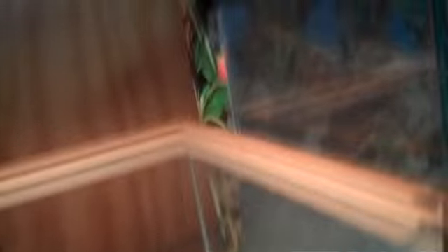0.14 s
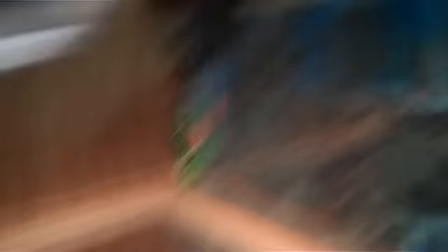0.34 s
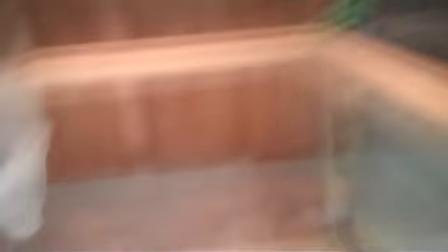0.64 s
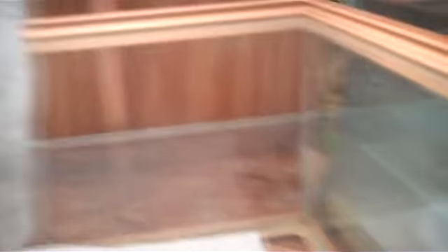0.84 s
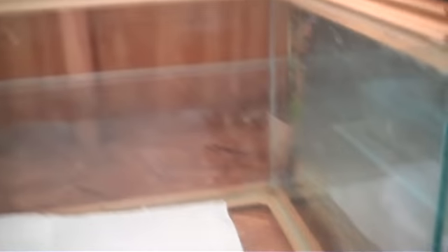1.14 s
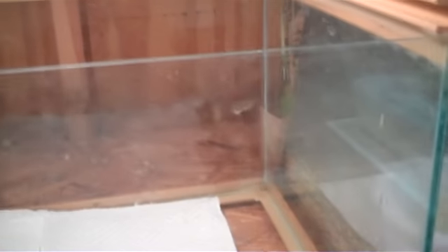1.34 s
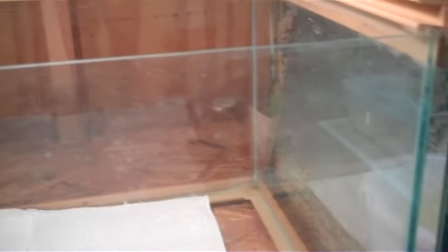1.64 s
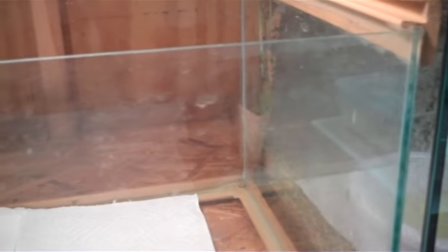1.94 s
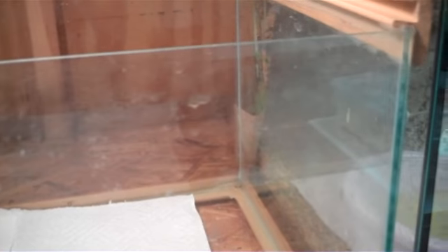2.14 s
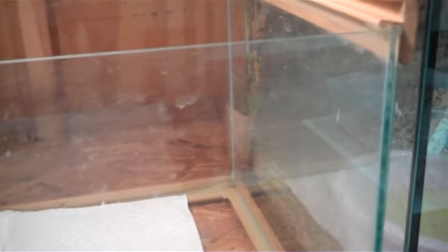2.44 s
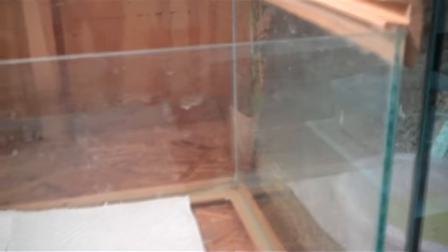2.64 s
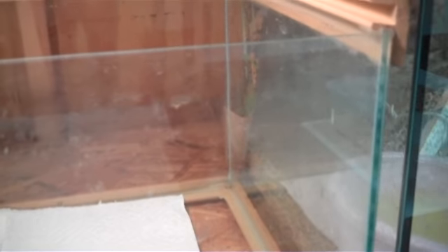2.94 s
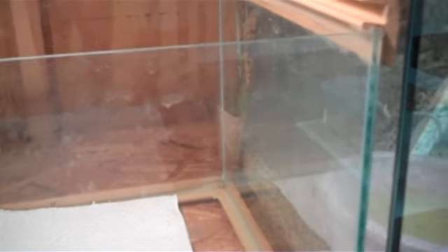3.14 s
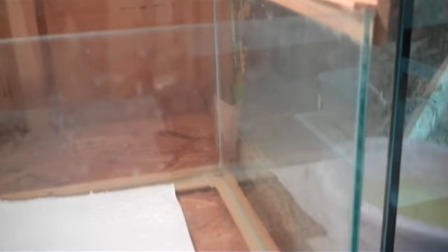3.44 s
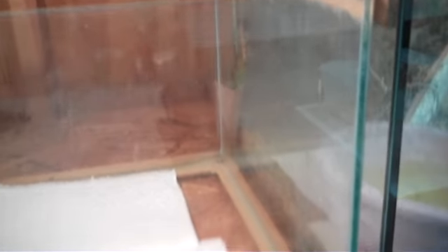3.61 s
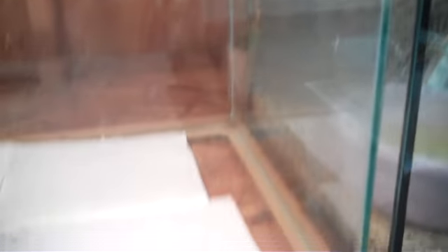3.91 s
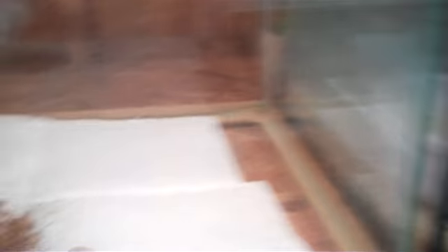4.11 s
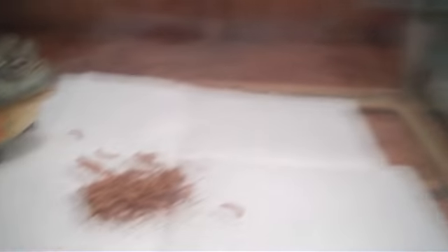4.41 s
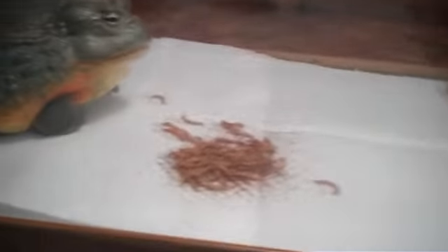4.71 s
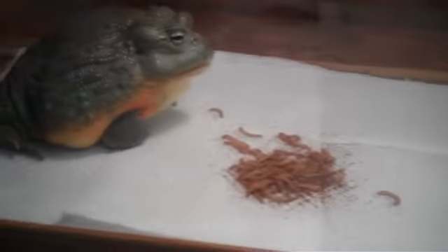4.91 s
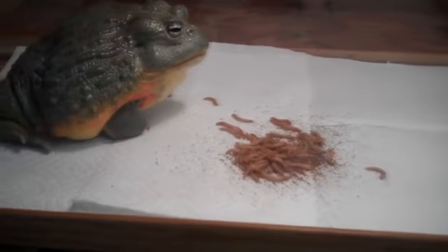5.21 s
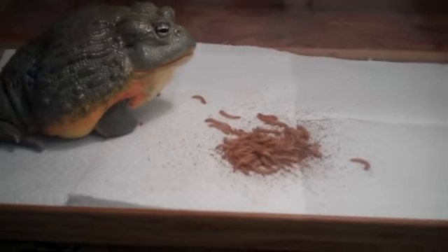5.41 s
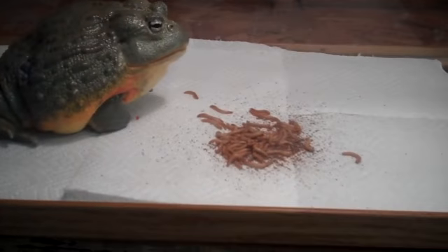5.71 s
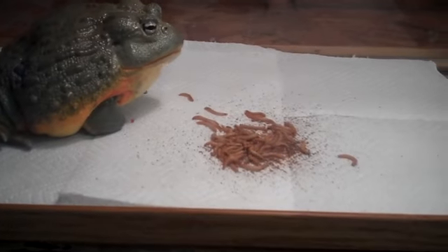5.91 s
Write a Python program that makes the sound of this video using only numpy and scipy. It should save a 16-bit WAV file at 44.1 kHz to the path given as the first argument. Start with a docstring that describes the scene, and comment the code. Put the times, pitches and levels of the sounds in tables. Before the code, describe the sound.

A quiet small room with faint steady air noise and barely audible hum, heard close from a handheld camera. From 0 to 0.3 s a thin plastic tub is handled right at the microphone: bright snaps, short crackle, soft dull bumps and a low lumpy finger rumble. A light stream of dry bran and small larvae then begins, a dense hiss of tiny ticks, uneven with a small surge near 1 s, swelling to its peak around 2.1 s, with occasional plastic ticks and soft tub knocks. It thins after 2.5 s and is nearly gone by 3.3 s. From 3.5 s the plastic is squeezed: a hard snap at about 3.75 s, then dense crisp crackling bursts from 4.1 to 5.3 s, packed tightest with sharp pops around 4.3 to 4.7 s. Crinkles grow sparser and softer until the end at 6 s.

```python
"""In a quiet room with faint hum, fingers rumble on a handheld camera as a thin plastic tub is picked
up close by, with pops, crackle and soft bumps. Dry bran and small larvae then slide out onto paper: a
dense stream of tiny ticks, a hiss swelling to its peak near 2 s. From about 3.5 s the squeezed plastic
crackles in dense bursts of ticks and sharp snaps, each a pair of millisecond rings with noise."""
import sys
import numpy as np
from scipy import signal
from scipy.fft import rfft, irfft, next_fast_len
from scipy.io import wavfile
from scipy.ndimage import uniform_filter1d

SR = 44100
rng = np.random.default_rng(int(sys.argv[2]) if len(sys.argv) > 2 else 0)


def voltage_ratio(decibels):
    """Convert decibels (scalar or array-like) to amplitude ratios, 20 dB per decade."""
    exponent = np.asarray(decibels, float) / 20
    return 10 ** exponent


def to_wav(sig):
    """Store sig (one row per channel, or 1-D mono) as 16-bit WAV at the path in sys.argv[1].

    Samples outside -1..1 are clipped; the rate is SR.
    """
    pcm = np.clip(np.atleast_2d(sig), -1, 1) * 32767
    pcm = np.round(pcm).astype(np.int16)
    wavfile.write(sys.argv[1], SR, pcm.T)  # frames by channels


N = 267246

# creases popping: start_s, ring_peak_db, ring_hz, second_ring_db (re ring), top_edge_db (re ring)
CREASE_POPS = [(0.0273, -21.5, 1660, -16, -50), (.0552, -19.5, 2360, -24, -55),
               (.0844, -27.5, 5920, -11, -41), (0.1388, -28, 1920, -11, -34), (0.1697, -8.5, 6460, -9, -26),
               (0.177, -19.5, 3030, -15, -50), (0.1835, -11, 6200, -3, -13), (0.2141, -16.5, 7000, -1, -24),
               (0.2476, -29.5, 1120, 1, -31), (.2521, -27.5, 5800, -19, -15), (0.307, -21, 6780, -25, -21),
               (0.312, -9.5, 6900, -13, -19), (0.321, -21.5, 5440, -19, -19), (0.6408, -21, 7100, -26, -17),
               (0.645, -26, 7000, -22, -35), (.7125, -27.5, 2160, -13, -40),
               (0.987, -27.5, 1950, -10.5, -29), (1.1097, -26.5, 3480, -9, -37),
               (1.1744, -20.5, 7240, -6, -36), (1.1794, -28, 4450, 0.5, -37),
               (1.6612, -28.5, 2830, -14, -30), (1.738, -29, 1320, 4, -44), (2.001, -26, 7300, 0, -30),
               (2.6378, -24, 3270, -14, -43), (3.201, -37, 2800, -1, -31.5), (3.4857, -21.5, 2050, -8, -40),
               (3.5358, -24.5, 3000, -0.5, -39), (3.6437, -21.5, 7200, -22, -18),
               (3.6674, -14.5, 7100, -1.5, -10), (3.7513, -24.5, 6740, 5.5, -21),
               (3.7547, -5, 6940, -26, -22), (3.7588, -28, 7400, -15, -28), (3.7957, -21, 6800, -20, -21),
               (3.8151, -18.5, 7450, -21, -14), (3.873, -27.5, 7260, -19, -30),
               (3.9067, -10, 6460, -31, -45), (3.9969, -13, 7300, -23, -34),
               (4.0319, -16.5, 3400, -13, -36), (4.0435, -14, 7550, -18, -12),
               (4.0534, -20, 7320, -15, -31), (4.0617, -22.5, 1980, -10, -32), (4.0832, -25, 7900, -1, -30),
               (4.1088, -13, 2420, -4, -14), (4.1414, -17, 2740, -12, -14), (4.1545, -20, 4250, -16, -32),
               (4.187, -17, 7400, -0.5, -30), (4.2588, -19.5, 3630, -20, -36), (4.262, -21, 3430, -16, -48),
               (4.2788, -16.5, 7250, -8, -30), (4.308, -22, 7040, -3, -38), (4.3204, -22, 2040, -12, -36),
               (4.3288, -22, 3500, -10, -40), (4.3371, -17, 7740, -25, -33), (4.3427, -17, 3250, -1, -11),
               (4.345, -9, 7400, -8, -15), (4.3574, -19.5, 2310, -8, -31), (4.392, -16, 3900, -20, -34),
               (4.396, -15.5, 3670, -19, -37), (4.3973, -15.5, 5850, -22, -37),
               (4.4121, -21, 3630, -20, -37), (4.416, -10.5, 3570, -16, -32), (4.4236, -10, 7580, -6, -19),
               (4.4322, -13, 3680, -8, -30), (4.4401, -15, 5200, -1, -30), (4.4883, -15, 3700, -17, -48),
               (4.5012, -13.5, 5460, -18, -16), (4.5176, -17, 5300, -6, -15), (4.522, -15, 6400, 3, -4),
               (4.5468, -11.5, 5700, -8, -14), (4.557, -16, 4720, -4, -28), (4.5965, -25.5, 4200, -12, -30),
               (4.6092, -22.5, 7500, -14, -45), (4.6424, -23, 4260, -13, -27), (4.648, -24, 3340, -6, -30),
               (4.6582, -12.5, 6000, -24, -21), (4.664, -21, 5850, -23, -13), (4.6984, -19, 7640, -12, -19),
               (4.7266, -16, 1540, 0, -40), (4.7504, -13, 5040, -10, -31), (4.7534, -22, 5670, -15, -31),
               (4.809, -16.5, 7260, -4, -37), (4.8307, -16.5, 7260, -9, -37),
               (4.8759, -17, 5800, -6, -11.5), (4.9425, -26, 2500, -12, -31), (4.9675, -26, 3950, -24, -43),
               (4.993, -23, 4160, -28, -34), (5.0133, -20, 2870, -20, -16), (5.0737, -22, 2350, -4, -8),
               (5.0785, -22, 7400, -15, -21), (5.1236, -24, 3150, -10, -31), (5.1287, -24, 5800, -14, -32),
               (5.162, -14.5, 3850, -10, -18), (5.174, -14, 5900, -26, -28), (5.2642, -19, 3600, -10, -46),
               (5.3217, -23, 6550, -12, -36), (5.3858, -20.5, 5670, -9, -38), (5.3962, -26.5, 5950, 2, -20),
               (5.489, -23.5, 5350, -19, -40), (5.5627, -33, 5370, -2, -35), (5.6402, -27, 7500, -4, -11),
               (5.801, -31, 4320, -15, -30), (5.8247, -27, 5960, -17, -33), (5.8852, -22, 7500, -7, -35)]
# spectrum of the plastic: frequency_hz, density_db (per Hz)
PLASTIC_SPECTRUM = [(120, -75), (200, -11), (323, -8), (360, -10), (829, -6), (956, -10), (1180, -5),
                    (1980, -1.5), (2450, -0.5), (4250, 5.5), (5960, 6), (7650, 4), (10500, -13),
                    (14000, -27.5)]
NEAR_UNTIL_S = 0.308  # at first the tub is at the camera


def evened(x):
    """Scales to rms 1."""
    return x / np.sqrt(np.mean(x ** 2) + 1e-20)


def read(points, hz):
    """Reads a spectrum table on a log-frequency axis."""
    f, value = np.transpose(points)
    return np.interp(np.log(hz + 1), np.log(f + 1), value)


def curve(rows):
    """The level column of a time table at every sample, and a gate that is open while the table runs."""
    rows, t = np.asarray(rows), np.arange(N) / SR
    running = (t > rows[0, 0]) & (t < rows[-1, 0])
    gate = uniform_filter1d(1. * running, 300)
    return np.interp(t, rows[:, 0], rows[:, 1]), gate


def colour(points, size=2048):
    """Minimum-phase impulse response with the given spectrum, energy 1."""
    level_db = np.maximum(read(points, abs(np.fft.fftfreq(size, 1 / SR))), -100)
    log_spectrum = np.conj(signal.hilbert(np.log(voltage_ratio(level_db))))
    taps = np.fft.ifft(np.exp(log_spectrum)).real[:size // 2]
    return taps / np.linalg.norm(taps)


def coloured(x, points, size=2048):
    """Gives both draws a spectrum, rms 1."""
    return evened(signal.oaconvolve(x, colour(points, size=size)[None], axes=1)[:, :N])


def band(x, lo_hz, hi_hz):
    """Gentle band-pass."""
    return signal.sosfilt(signal.butter(2, [lo_hz, hi_hz], "band", fs=SR, output="sos"), x)


def grains(per_s, spread_db, clump_db, clump_s, wet_db, t60_s, count=18):
    """Tiny tuned ticks of uneven size plus a haze of close reflections; two draws share one clumping."""
    clumps = evened(uniform_filter1d(rng.standard_normal(N), max(round(clump_s * SR), 2)))
    size = voltage_ratio(spread_db * np.minimum(rng.exponential(1, (2, N)), 4))
    size *= rng.random((2, N)) < per_s / SR
    size *= voltage_ratio(clump_db * clumps) * rng.choice([-1., 1.], (2, N))
    kind = rng.integers(0, count, (2, N))
    t, ticks = np.arange(192) / SR, np.zeros((2, N))
    for k, hz in enumerate(np.linspace(300, 15000, count)):
        life_s = .00005 * 1.88 ** (k % 3)  # from a bare click to a few cycles
        tick = np.cos(2 * np.pi * hz * t) * t * np.exp(-t / life_s) / life_s ** 1.83
        ticks += signal.oaconvolve(size * (kind == k), tick[None], axes=1)[:, :N]
    # glass, paper and tub return each tick's energy as noise that dies away
    keep = voltage_ratio(-120 / (t60_s * SR))  # power kept per sample
    haze_power = signal.lfilter([1 - keep], [1, -keep], evened(size) ** 2)
    haze = np.sqrt(haze_power) * rng.standard_normal((2, N))
    return evened(evened(ticks) + voltage_ratio(wet_db) * haze)


def patchy(x, patch_db):
    """Random drifting patches of level over time and pitch make the texture uneven."""
    z = signal.stft(x, nperseg=512, noverlap=384)[2]
    patches = uniform_filter1d(rng.standard_normal(z.shape[1:]), size=4, axis=0)
    patches = uniform_filter1d(patches, size=12, axis=1)
    z = z * voltage_ratio(patch_db * evened(patches))
    return evened(signal.istft(z, nperseg=512, noverlap=384)[1][:, :N])


def snaps():
    """Each crease pops once: two short rings, a wide click, a wall thump, a top edge, a short haze."""
    partner_ratio, split_hz = 2.38, 4400  # second ring: below a bright pop, above a dull one
    near_ratio = 2.3  # near the camera the second ring of a bright pop lies this much lower
    # brighter pops move the wall less; near the camera it thumps harder
    thump_at_1khz_db, thump_db_per_octave, near_db = -16.5, -8, 8.5
    length = 3072
    t = np.arange(length) / SR
    out, aside = np.zeros((2, N + length)), np.zeros(N + length)
    wide = colour(PLASTIC_SPECTRUM, size=2 * length)
    chance = rng.standard_normal((len(CREASE_POPS), 3, 2, length))
    fade = (1 - np.exp(-t / 0.0009)) * voltage_ratio(-60 * t / 0.036)

    def shape(peak_s):
        """Smooth pulse that peaks at 1."""
        return (t / peak_s * np.exp(1 - t / peak_s)) ** 2

    for (start_s, peak_db, hz, partner_db, edge_db), (rough, low, high) in zip(CREASE_POPS, chance):
        near = start_s < NEAR_UNTIL_S
        if hz > split_hz:
            partner_hz = hz / partner_ratio / (near_ratio if near else 1)
        else:
            partner_hz = hz * partner_ratio
        turn = np.array([[0], [rough[1, 0] * np.pi]])  # the scattered copy arrives out of step
        ring = np.sin(2 * np.pi * hz * t + turn)
        ring += voltage_ratio(partner_db) * np.sin(2 * np.pi * partner_hz * t + turn)
        pop = ring * shape(0.00027) + 0.22 * wide / abs(wide).max()
        pop += 0.074 * evened(band(rough, 1670, 5500)) * shape(0.0017)
        thump_db = thump_at_1khz_db + thump_db_per_octave * np.log2(hz / 1000) + near_db * near
        pop += voltage_ratio(thump_db) * evened(band(low, 430, 1040)) * shape(0.0025)
        pop += voltage_ratio(edge_db) * evened(band(high, 9500, 15500)) * shape(0.00029)
        haze = evened(band(low, 0.65 * hz, 1.11 * hz))
        haze += 0.54 * evened(signal.fftconvolve(high, wide[None, :256], axes=1)[:, :length])
        pop = voltage_ratio(peak_db) * (pop + voltage_ratio(-16.0) * haze * fade)
        at = round(start_s * SR)
        out[:, at:at + length] += pop
        aside[at:at + length] += 0.11 * rough[0, 0] * pop[0]  # each pop leans left or right at random
    # pops come from one near spot: less difference between the ports
    return ports(out[:, :N], side_db=-3.5) + aside[:N] * np.array([[1], [-1]])


def strain():
    """Crackle and tub wall gains: finger pressure, settling after pops and scrunches add in power."""
    # steady pressure of the fingers on the tub: time_s, crackle_db
    squeeze = [(3.47, -50), (3.5, -52.5), (3.83, -44.5), (4.12, -43.5), (4.21, -45), (4.57, -46),
               (4.71, -38), (5.21, -42), (5.53, -42.5), (5.99, -56), (6.06, -48.5)]
    # runs of creases giving way at once: start_s, length_s, crackle_db, wall_gain_db (re crackle)
    scrunches = [(0.061, 0.16, -47.5, 9.5), (0.17, .13, -46.5, 2), (0.286, 0.0083, -38, -17),
                 (1.289, 0.012, -41, 3.5), (3.676, 0.023, -38.5, 8), (4.03, 0.033, -47, -4),
                 (4.091, 0.066, -31.5, 1.5), (4.245, 0.016, -39, 9), (4.314, 0.068, -39.5, -11),
                 (4.383, 0.074, -34, -7), (4.478, 0.084, -35, -9), (4.637, 0.018, -37, -15),
                 (4.69, .065, -35, 6), (4.856, 0.047, -38.5, 9), (4.975, 0.068, -35.5, 8.5),
                 (5.066, 0.015, -32.5, 6.5), (5.124, 0.068, -40.5, 3), (5.204, 0.037, -39.5, -1),
                 (5.266, 0.033, -44.5, 4), (5.388, 0.064, -40.5, -9), (5.537, 0.15, -42, -7),
                 (5.781, 0.13, -44.5, -11), (6.045, 0.022, -57, 0)]
    scrunch_rise_s, scrunch_t60_s = 0.0082, 0.097
    settle_db, settle_t60_s = -32.5, 0.46  # each pop leaves the sheet crackling: re ring peak
    wall_gain_db = 2.5  # re crackle, outside scrunches
    t, pops = np.arange(N) / SR, np.zeros(N)
    level_db, gate = curve(squeeze)
    for start_s, peak_db, *_ in CREASE_POPS:
        pops[round(start_s * SR)] += voltage_ratio(peak_db + settle_db) ** 2
    settling = signal.lfilter([1], [1, -voltage_ratio(-120 / (settle_t60_s * SR))], pops)
    power = (gate * voltage_ratio(level_db)) ** 2 + settling
    wall = power * voltage_ratio(wall_gain_db) ** 2
    for start_s, length_s, db, wall_db in scrunches:
        rise = np.clip((t - start_s) / scrunch_rise_s, 0, 1)
        after_s = np.maximum(t - start_s - length_s, 0)
        run = (rise * voltage_ratio(db - 60 * after_s / scrunch_t60_s)) ** 2
        power, wall = power + run, wall + run * voltage_ratio(wall_db) ** 2
    return np.sqrt(power), np.sqrt(wall)


def crackle():
    """Countless small creases give way under the fingers, and the tub wall joins in."""
    ticks = grains(per_s=1700, spread_db=3.5, clump_db=2.0, clump_s=0.006, wet_db=1.5, t60_s=0.058)
    ticks = patchy(coloured(ticks, PLASTIC_SPECTRUM), patch_db=2.43)
    deep, middle = band(ticks, 690, 1995), band(ticks, 1920, 3490)
    away = np.arange(N) > NEAR_UNTIL_S * SR  # the wall's upper band sounds only away from the camera
    creases, wall = strain()
    return creases * ticks + wall * (deep + voltage_ratio(-3) * away * middle)


def pour():
    """A dense stream of dry flakes sliding over plastic and landing on paper."""
    # pouring: time_s, hiss_db
    stream = [(.3, -64), (.42, -57.5), (.5, -58), (.72, -52), (.88, -54), (.96, -48.5), (1.06, -46.5),
              (1.14, -54.5), (1.3, -52), (1.45, -52), (1.68, -44.5), (1.9, -42.5), (2.0, -39),
              (2.12, -37.5), (2.42, -44), (2.75, -54), (2.86, -48), (2.93, -57.5), (3.2, -57), (3.35, -89),
              (3.6, -66)]
    # spectrum of the flakes: frequency_hz, density_db (per Hz)
    bran = [(100, -51), (200, -10), (450, -11), (730, -8), (1000, -10.5), (1500, -12), (2250, -2.5),
            (3200, -7), (4400, -2.5), (5800, -5), (6800, -5), (7500, 2.5), (8300, -4.5), (9600, -16),
            (16500, -19)]
    flakes = grains(per_s=12000, spread_db=1.0, clump_db=1.58, clump_s=0.0096, wet_db=-6.0, t60_s=0.095)
    level_db, gate = curve(stream)
    return gate * voltage_ratio(level_db) * patchy(coloured(flakes, bran), patch_db=1.47)


def bumps():
    """Soft bumps of the tub on hand and glass: a dull wall ring in rough noise, swelling over a few ms."""
    # start_s, level_db (before the swell), ring_hz, t60_s
    knocks = [(0.081, -26.5, 735, 0.043), (0.114, -29.5, 290, 0.027), (0.249, -33, 261, 0.088),
              (0.534, -38, 600, 0.038), (0.936, -30.5, 690, 0.021), (1.078, -32, 1060, 0.016),
              (1.829, -37.5, 660, 0.031), (2.027, -30.5, 640, 0.029), (2.345, -39.5, 730, 0.087),
              (2.572, -41, 514, 0.048)]
    length = 8192
    out, t = np.zeros(N + length), np.arange(length) / SR
    for (start_s, level_db, hz, t60_s), rub in zip(knocks, rng.standard_normal((len(knocks), length))):
        ring = np.sin(2 * np.pi * hz * t) + 0.81 * evened(band(rub, 0.46 * hz, 2.1 * hz))
        swell = 1 - np.exp(-t / 0.005)
        out[round(start_s * SR):][:length] += ring * swell * voltage_ratio(level_db - 60 * t / max(t60_s, .01))
    return out[:N] * voltage_ratio([[1.5], [-1.5]])  # left, right dB


def grip():
    """Fingers shifting on the camera: lumpy low rumble carried through its body."""
    # time_s, rumble_db
    shifts = [(.02, -53), (.06, -60), (.19, -43.5), (.3, -51.5), (.42, -62), (1.7, -64.5), (2.14, -62.5),
              (2.5, -68.5), (3.0, -66), (3.56, -63), (3.64, -56.5), (4.43, -56), (4.5, -68), (4.72, -59),
              (4.9, -66.5), (6.06, -64)]
    lumps = voltage_ratio(2.5 * evened(uniform_filter1d(rng.standard_normal(N), 1500)))
    rumble = evened(lumps * band(rng.standard_normal((2, N)), 52, 430))
    level_db, gate = curve(shifts)
    return gate * voltage_ratio(level_db) * rumble


def room():
    """Steady air noise with a few faint wavering hum tones."""
    # air noise spectrum: frequency_hz, density_db (per Hz)
    air_spectrum = [(15, -10), (30, -1), (64, -23), (160, -12), (320, -9.5), (450, -1), (900, 3),
                    (1440, -0.5), (5000, -0.5), (7300, 2.5), (9600, -5.5), (16500, -45)]
    # faint hum: tone_hz, level_db
    hum = [(81, -90), (118, -91), (238, -81.5), (336, -76.5)]
    out = voltage_ratio(-60) * coloured(rng.standard_normal((2, N)), air_spectrum, size=16384)
    t = np.arange(N) / SR
    for hz, level_db in hum:
        waver = 1 + 0.12 * evened(uniform_filter1d(rng.standard_normal(N), 6000))
        out += voltage_ratio(level_db) * np.sqrt(2) * waver * np.sin(2 * np.pi * hz * t)
    return out


def ports(x, side_db=0.):
    """Two ports: most alike around 1 kHz, less so in the bass, out of step and unequal in the treble."""
    # likeness of the two microphone ports in one housing: frequency_hz, likeness (0-1)
    likeness = [(60, .62), (250, .78), (1000, .9), (2500, .78), (5000, .65), (9000, .5), (14000, .55)]
    # level balance at side_db 0: frequency_hz, left_re_right_db
    balance = [(60, 4), (500, 3), (1500, .6), (2600, -2), (4400, -5), (6000, 0.), (8100, 6.5), (14000, 13)]
    # phase at side_db 0: frequency_hz, left_lead_rad
    phase = [(100, 0.), (2900, .1), (4300, 1.3), (6500, 3.1), (9500, 3.6), (16000, 3.6)]
    size = next_fast_len(N + 4096)
    hz = np.fft.rfftfreq(size, 1 / SR)
    alike, lead, lean = np.clip(read(likeness, hz), 0, 1), read(phase, hz), voltage_ratio(read(balance, hz))
    direct, scattered = rfft(x, size)
    total, shared = lean + 1 / lean, 2 * alike * np.cos(lead)
    both, apart = total + shared, total - shared  # power of left plus right, left minus right
    # part of left minus right that follows the sum, and the part that does not
    tied = (lean - 1 / lean + 2j * alike * np.sin(lead)) / both
    loose = np.sqrt(np.maximum(apart / both - abs(tied) ** 2, 0))
    side = voltage_ratio(side_db) * (tied * direct + loose * scattered)
    return irfft(np.array([direct + side, direct - side]), size)[:, :N]


def scene():
    """All sources as the two ports receive them."""
    # the tub moves across the camera: time_s, left_re_right_db (added to the ports' own)
    tub_side = [(0, -1), (3.6, 1.3), (4.1, -0.5), (4.7, -1.5), (6.06, -1)]
    side_db = np.interp(np.arange(N) / SR, *np.transpose(tub_side))
    toward = voltage_ratio(side_db * np.array([[.5], [-.5]]))
    plastic = toward * (snaps() + ports(crackle()))
    return plastic + bumps() + ports(pour() + grip() + room())


def roll_off(x):
    """The treble ends steeply here."""
    return signal.sosfilt(signal.butter(12, 16500, fs=SR, output="sos"), x)


def record(dry):
    """Limits the band with a steep linear-phase low-pass."""
    low_pass = signal.firwin(255, 16450, window=("kaiser", 9), fs=SR)
    mix = signal.oaconvolve(dry, low_pass[None], "same")
    return roll_off(mix)


dry = scene()
out = record(dry)
to_wav(out)
```